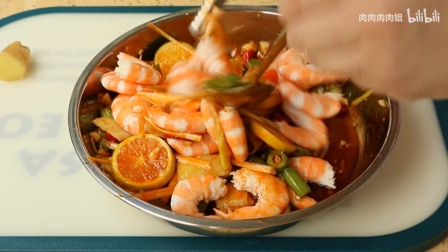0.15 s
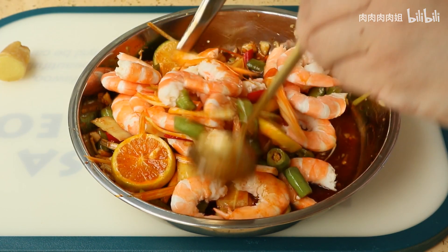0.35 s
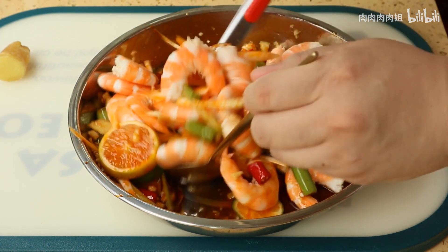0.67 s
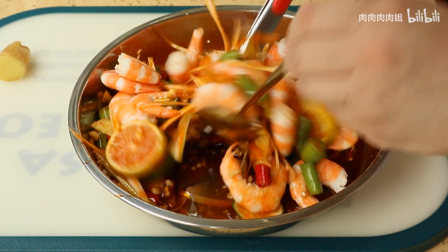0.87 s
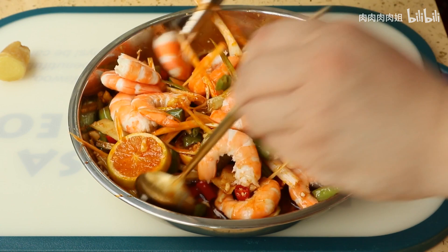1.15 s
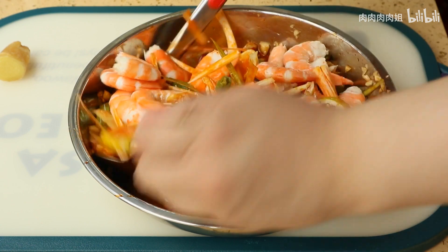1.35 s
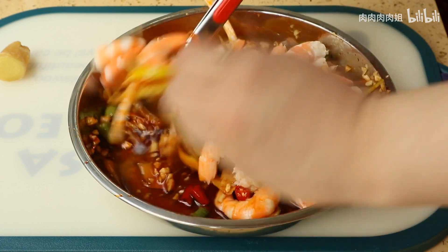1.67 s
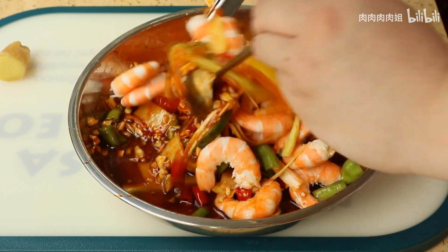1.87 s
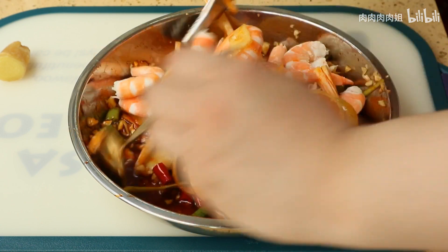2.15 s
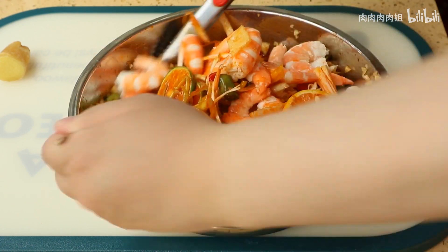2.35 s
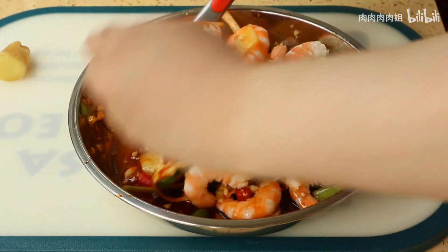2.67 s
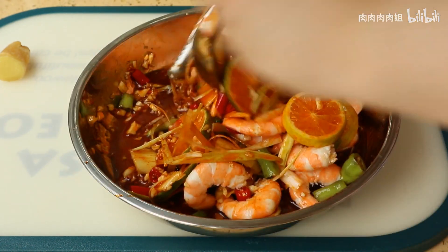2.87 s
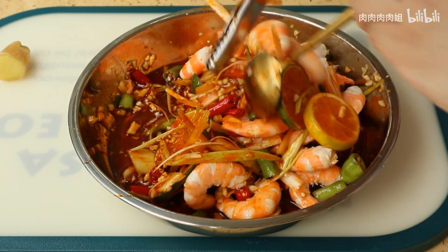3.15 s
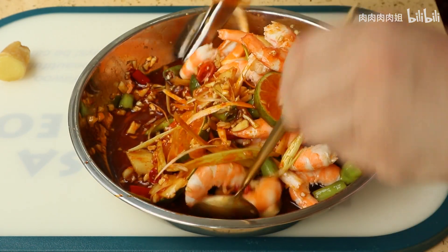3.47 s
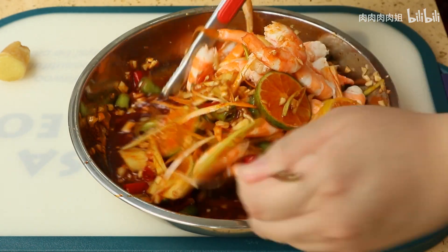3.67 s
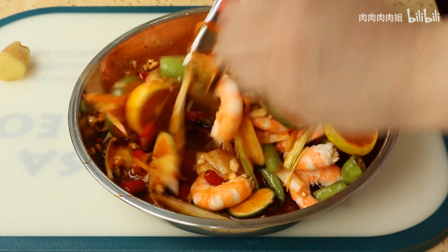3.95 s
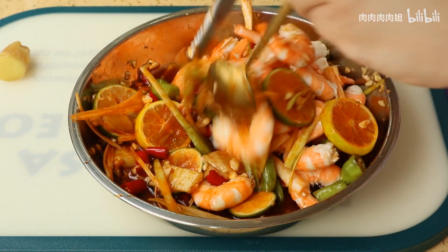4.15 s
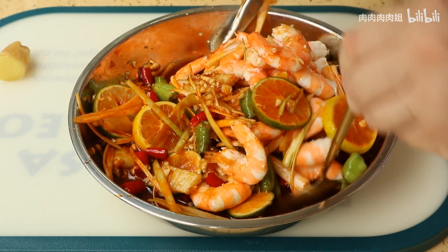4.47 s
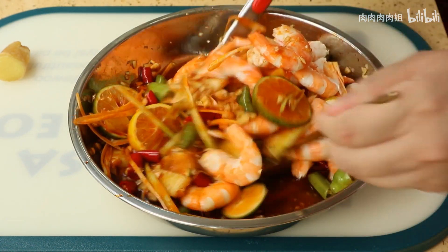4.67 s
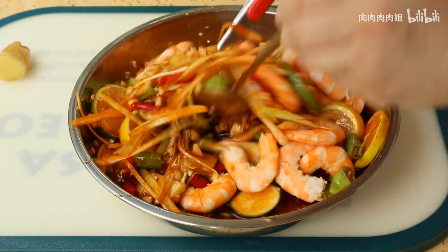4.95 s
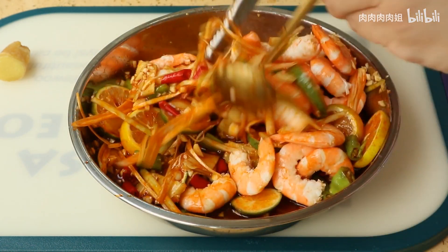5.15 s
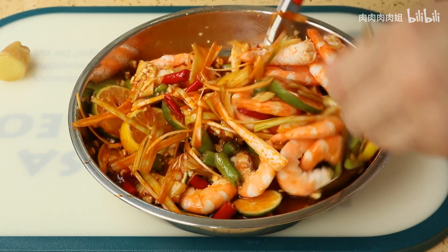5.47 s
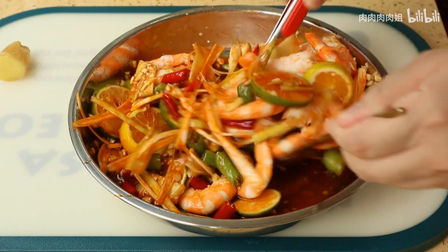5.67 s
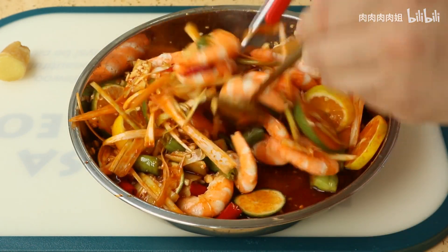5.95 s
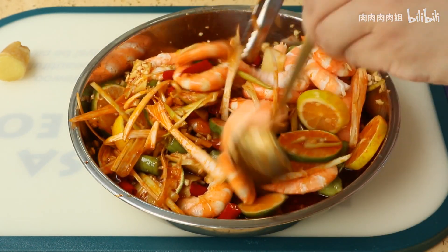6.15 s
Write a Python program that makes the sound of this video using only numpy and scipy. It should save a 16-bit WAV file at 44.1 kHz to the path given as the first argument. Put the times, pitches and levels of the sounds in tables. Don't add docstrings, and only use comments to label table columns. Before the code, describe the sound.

The tail of a spoon scrape opens, then steel utensils strike a loaded metal bowl in a regular tossing rhythm. The rings are short and damped by food, with quick rebounds, dull knocks on the plastic board, small ticks and soft wet slaps. Close stereo microphone, short hard-walled room echo; a low background rumble and hum sink after the loud blows and creep back.

```python
import sys
import numpy as np
from scipy import signal
from scipy.fft import rfft, irfft, next_fast_len
from scipy.io import wavfile
from scipy.ndimage import uniform_filter1d, map_coordinates

SR = 44100
rng = np.random.default_rng(int(sys.argv[2]) if len(sys.argv) > 2 else 0)


def waveform_to_disk(signal):
    frames = np.transpose(np.atleast_2d(signal))
    scaled = np.clip(frames, -1, 1) * 32767
    samples = np.round(scaled).astype(np.int16)
    wavfile.write(sys.argv[1], SR, samples)


def invert_db(level):
    return 10 ** (np.asarray(level, dtype=float) / 20)


N = 278271


def unit(x):
    return x / np.sqrt(np.mean(x ** 2) + 1e-20)


def along(points, hz):
    point_hz, value = np.transpose(points)
    return np.interp(np.log(hz + 1), np.log(point_hz + 1), value)


def wobble(rate):
    knots = rng.standard_normal(int(N * rate / SR) + 4)
    return map_coordinates(knots, [np.arange(N) * rate / SR])


# pitch_hz, likeness (0-1)
LIKENESS = [(60, 1.0), (100, 1), (180, 0.98), (310, 0.96), (550, 0.69), (950, 0.95), (1650, 0.63),
            (2860, 0.59), (4970, 0.08), (8640, 0.96), (15000, 0.31)]


def rush(gain, patchy_db):
    z = signal.stft(rng.standard_normal((2, N)), nperseg=512)[2]
    patches = uniform_filter1d(rng.standard_normal(z.shape[1:]), size=6, axis=0)
    patches = uniform_filter1d(patches, size=10, axis=1)
    pair = signal.istft(z * invert_db(patchy_db * unit(patches)), nperseg=512)[1][:, :N]
    size = next_fast_len(N + 8192)
    hz = np.fft.rfftfreq(size, 1 / SR)
    turn = np.arccos(np.clip(along(LIKENESS, hz), -1, 1)) / 2
    shares = [np.cos(turn), np.sin(turn)]
    mid, side = irfft(rfft(pair, size) * gain(hz) * shares, size)[:, :N]
    return unit(np.array([mid + side, mid - side]))


# time_s, level_db
ROOM_LEVEL = [(0.0, -38.5), (1.1, -36), (3.0, -39), (4.3, -39.5), (5.4, -38), (6.31, -40.5)]


def room_level_db():
    return np.interp(np.arange(N) / SR, *np.transpose(ROOM_LEVEL))


# pitch_hz, level_db (per Hz)
DRONE_COLOUR = [(15, -47), (25, -10), (87, -2.5), (149, -2.5), (229, -3), (427, -11.5), (754, -11),
                (1370, -15.5), (1740, -17), (2220, -20.5), (2410, -19.5), (5880, -34.5), (11300, -50),
                (14400, -66), (16000, -78)]


def drone():
    colour = lambda hz: invert_db(along(DRONE_COLOUR, hz))
    return invert_db(room_level_db() + 2.0 + 0.23 * wobble(3)) * rush(colour, patchy_db=1.6)


# pitch_hz, width_hz, level_db
ROOM_PEAKS = [(45, 5.9, 2), (158.4, 15, 4), (201, 28, -7), (771, 61, -3.5)]


def boom():
    def peaks(hz):
        return sum(invert_db(db) / np.sqrt(1 + ((hz - centre) / width * 2) ** 4)
                   for centre, width, db in ROOM_PEAKS)
    return invert_db(room_level_db() - 9.0) * rush(peaks, patchy_db=np.sqrt(2))


# time_s, pitch_hz, level_db
MOTOR_PATH = [(0.0, 87.1, -36), (0.26, 86.4, -42), (0.33, 84, -33.5), (0.83, 80.2, -42), (1.05, 85, -40),
              (1.47, 88, -42.5), (1.87, 80.5, -53), (2.05, 88.3, -40), (2.55, 84.5, -43.5),
              (2.95, 88.3, -38), (3.36, 83, -40), (3.58, 64.1, -55), (3.95, 72.3, -39.5), (4.24, 74.5, -58),
              (4.36, 73.2, -46), (4.65, 63.2, -52), (5.46, 70.6, -35.5), (6.31, 76.5, -55.5)]


def motor():
    now = np.arange(N) / SR
    time_s, pitch_hz, level_db = np.transpose(MOTOR_PATH)
    speed_hz = np.interp(now, time_s, pitch_hz) * (1 + 0.02846 * wobble(17))
    turns = np.cumsum(speed_hz) / SR
    strength_db = np.interp(now, time_s, level_db) - 1.0 + 1.46 * wobble(12)
    return invert_db(strength_db) * np.sin(2 * np.pi * turns)


def since_blows():
    return np.maximum(np.arange(N) / SR - np.array(HARD_BLOWS)[:, :1], 0)


# pitch_hz, level_db (per Hz)
SAUCE_COLOUR = [(1200, -32), (2500, 5.5), (4000, 0), (7000, -7), (11000, -9.5), (15000, -20)]


def slosh():
    rest_db, splash_db, rise_s, fall_s = -54, 16.5, 0.093, 0.32
    since = since_blows()
    surge = np.minimum(since / rise_s, 1) * np.exp(-since / fall_s)
    slosh_db = rest_db + splash_db * surge.max(axis=0)
    clumps = invert_db(1.5 * wobble(20) + 3 * wobble(200))
    wet = rush(lambda hz: invert_db(along(SAUCE_COLOUR, hz)), patchy_db=5.5)
    return invert_db(slosh_db - 1.5) * unit(clumps * wet)


def background():
    return drone() + boom() + motor() + slosh()


def dying_noise(gain, t60, size=SR // 2):
    hz, t, z = signal.stft(rng.standard_normal((2, size)), SR, nperseg=128)
    fading = invert_db(-60 * t / t60(hz)[:, None])
    return signal.istft(z * gain(hz)[:, None] * fading, SR, nperseg=128)[1][:, :size]


# pitch_hz, fade_s
ECHO_FADE = [(200, 0.1), (2000, 0.4), (10000, 0.16)]


def kitchen(x):
    fade = lambda hz: along(ECHO_FADE, hz)
    mid = dying_noise(np.ones_like, fade)[0]
    side = dying_noise(lambda hz: 0.98 * along(STEREO_SPREAD, hz), fade)[0]
    tail = np.array([mid + side, mid - side]) / np.linalg.norm(mid)
    late = np.pad(x.mean(axis=0), (300, 0))[None]
    return signal.fftconvolve(late, tail, axes=1)[:, :N]


# pitch_hz, fade_s
CLATTER_FADE = [(200, 0.27), (1500, 0.22), (4000, 0.21), (10000, 0.17)]
# pitch_hz, spread_radians
STEREO_SPREAD = [(200, 0.029), (700, 0.16), (2400, 0.18), (4400, 0.85), (8000, 0.89), (15000, 0.17)]


def contact(s, peak_db, hz, level_db, t60, clatter_db, sustain, chatter_s, flutter, size=SR // 2):
    t = np.arange(size) / SR
    chance = rng.standard_normal((3, len(hz), 1))
    lean = along(STEREO_SPREAD, hz) * chance[0] * [[[1]], [[-1]]]
    start = chance[1] ** 2 * chatter_s
    knots = rng.standard_normal((2, len(hz), size // 110))
    depth, drift = signal.resample(knots, len(t), axis=2) * flutter
    swell = np.clip((t - start) / 0.00018, 0, 1) * (1 + depth)
    fall = invert_db(level_db - 60 * t / (sustain * t60))
    pitch = hz * (1 + chance[2] / 1000)
    ring = (swell * fall * np.sin(2 * np.pi * pitch * t + drift + lean)).sum(axis=1)

    top_db = level_db[-1, 0]
    lift_db = 4.9 * np.clip(np.log2(hz[:, 0] / 5000), 0, 1)
    colour_db = uniform_filter1d(level_db[:, 0], size=3) + lift_db
    colour = list(zip([60, *hz[:, 0], 14000, 16300], [-55, *colour_db, top_db - 6, top_db - 37]))
    gain = lambda f: invert_db(along(colour, f))
    fade = lambda f: sustain * along(CLATTER_FADE, f)
    mid = dying_noise(gain, fade, size)[0]
    side = dying_noise(lambda f: gain(f) * along(STEREO_SPREAD, f), fade, size)[0]
    snap = (1 - np.exp(-t / 0.00014)) * (1 + 1.52 * np.exp(-t / 0.002))
    burst = np.array([mid + side, mid - side]) * snap

    loud = lambda x: np.sqrt(np.mean(x[:, :SR // 100] ** 2))
    both = ring / loud(ring) + invert_db(clatter_db) * burst / loud(burst)
    lead = SR // 400
    graze = invert_db(-40) * burst[:, :lead] / loud(burst)
    whole = invert_db(peak_db) * np.concatenate([graze, both / loud(both)], axis=1)
    return np.pad(whole, ((0, 0), (round(s * SR), N)))[:, lead:N + lead]


def rattle(modes, s, db, clatter_db, sustain, flutter=0.99):
    hz, level_db, t60 = np.transpose(modes)[:, :, None]
    return contact(s, db, hz, level_db, t60, clatter_db, sustain, chatter_s=.0004, flutter=flutter)


# pitch_hz, level_db, fade_s
SCRAPE_MODES = [(750, -6, .3), (1150, 0, .3), (1400, -1, .3), (1660, -1, .28), (2250, -2, .25),
                (3000, -10, .2), (3700, -4, .22), (5200, -14, .2), (9000, -22, .15)]


def scrape():
    return rattle(SCRAPE_MODES, 0, -32, clatter_db=-10, sustain=1.3)


# time_s, level_db
TONG_SNAP = [
    (2.1865, -22),
]
# pitch_hz, level_db, fade_s
TONG_MODES = [(2830, -4, 0.21), (4215, 1, 0.18), (4400, -8, 0.17), (6137, -7, 0.2), (8030, -2, 0.17),
              (10300, -7, .08), (11400, -12, .08), (12740, -16, 0.11)]


def tongs():
    time_s, level_db = TONG_SNAP[0]
    return rattle(TONG_MODES, time_s, level_db - 9, clatter_db=-4.0, sustain=1.0)


# time_s, level_db
BOARD_KNOCKS = [
    (0.5835, -20.5),
    (1.3009, -31),
    (3.577, -22),
    (4.574, -29),
    (5.548, -26.5),
]
# pitch_hz, level_db, fade_s
BOARD_MODES = [(190, -1, 0.15), (608, -9, 0.14), (801, 1, 0.12), (1276, -11, 0.093), (1665, 1.5, 0.12)]


def board():
    return sum(rattle(BOARD_MODES, s, db, clatter_db=-16, sustain=1.0, flutter=.5) for s, db in BOARD_KNOCKS)


COLOUR_ZONES = [500, 1500, 2700, 4300, 8500]
# bass_db, low_db, high_db, top_db
BRIGHTER = (0.1, 0.1, 35.5, 31.7)


def ticks(events, dull_db):
    hz = np.c_[WALL_PITCHES]
    t60, level_db = np.transpose(WALL_MODES)[:2, :, None]
    out = np.zeros((2, N))
    for s, db, brightness, sustain in events:
        bass_db, low_db, high_db, top_db = np.add(dull_db, np.multiply(brightness, BRIGHTER))
        zone_db = along(list(zip(COLOUR_ZONES, [bass_db, low_db, 0, high_db, top_db])), hz)
        mode_db = level_db + zone_db + rng.normal(0, 1.7, hz.shape)
        out += contact(s, db - 13.5, hz, mode_db, t60, 6.4, sustain, chatter_s=.002, flutter=1.0,
                       size=SR // 5)
    return out


# time_s, level_db, brightness (0-1), sustain (factor)
FOOD_SLAPS = [(1.1069, -37, 0.5, 0.81), (1.4701, -34.5, 0.44, 1.36), (2.0543, -27, 0.5, 2.07),
              (2.5296, -39, 0.27, 1.2), (2.7794, -31.5, 0.54, 1.77), (3.131, -43, 0.23, 0.82),
              (3.4465, -52, 0.43, .87), (4.1185, -30.5, 0.47, 1.03), (4.3944, -39, 0.65, 1.04),
              (4.6444, -25.5, 0.63, 3.5), (4.73, -34, 0.3, 1.2), (4.815, -29, 0.33, 1.6),
              (5.8358, -24.5, 0.4, 0.62), (5.9323, -38, 0, 0.74)]
# bass_db, low_db, high_db, top_db
SLAP_COLOUR = (-2.5, 5.5, -16.5, -12)


def slaps():
    return ticks(FOOD_SLAPS, SLAP_COLOUR)


# time_s, level_db, brightness (0-1), sustain (factor)
STEEL_TOUCHES = [(0.6727, -22.5, 0.38, 1), (1.1595, -23, 0, 0.75), (1.4214, -36.5, .95, 1.1),
                 (1.5436, -33.5, 0.83, 2.3), (2.0092, -35.5, 0.36, 1.7), (3.8448, -29.5, .1, 1.8),
                 (3.9913, -24.5, .9, 0.67), (4.6655, -28.5, .4, 0.73), (5.0164, -40, 0.46, 0.64),
                 (5.0824, -30, 0.17, .85), (5.8547, -34, 0.59, .74), (6.29, -34.5, .2, .8)]
# bass_db, low_db, high_db, top_db
TOUCH_COLOUR = (-14, -13, -23, -8)


def touches():
    return ticks(STEEL_TOUCHES, TOUCH_COLOUR)


# time_s, level_db, brightness (0-1), sustain (factor)
TOOL_JOLTS = [
    (1.2283, -7.5, .1, 0.85),
    (4.4874, -19, .3, .6),
]
# bass_db, low_db, high_db, top_db
JOLT_COLOUR = (-6, -15.5, -7, -17.5)


def jolts():
    return ticks(TOOL_JOLTS, JOLT_COLOUR)


def strikes(events, modes_hz, modes, clatter_db, sustain, softer):
    t60, level_db, *shifts_db = np.transpose(modes)[:, :, None]
    out = np.zeros((2, N))
    for s, db, *how in events:
        mode_db = level_db + np.tensordot(how, shifts_db, axes=1)
        held = max(sustain - softer * db, .2)
        out += contact(s, db - 3.5, np.c_[modes_hz], mode_db, t60, clatter_db, held,
                       chatter_s=0.00091, flutter=0.033 / t60)
    return out


# time_s, level_db, hardness (-1..1), height (-1.1..1), angle (-1..1)
TOOL_REBOUNDS = [
    (0.5811, -13.5, 0.01, 0.65, -0.71),
    (1.2989, -26.5, -0.37, 0.085, -0.8),
    (2.3151, -14.5, 0.98, 0.33, 0.019),
    (3.5753, -11, -0.073, 0.55, -0.041),
    (4.5366, -15.5, 0.98, -0.24, -0.75),
    (4.5715, -24, 0.28, -0.072, 0.58),
    (5.4704, -16, 1, -0.61, -0.34),
    (5.4984, -19, 0.56, -1.1, -0.81),
]
# time_s, level_db, hardness (-1..1), height (-1..1), angle (-1.2..1)
SOFT_LANDINGS = [
    (2.378, -27.5, 0.65, -0.33, -1.2),
    (3.5614, -21.5, 0.48, 0.018, -1.1),
    (5.5463, -17, 0.22, -0.1, -0.12),
    (5.669, -20.5, 0.36, -0.59, -0.84),
]
BASE_PITCHES = [200, 603, 790, 1190, 1560, 1740, 2150, 2560, 2805, 3047, 3505, 4115, 4715, 5243, 5600, 6955,
                7600, 8200, 10300]
# fade_s, level_db, then the change in dB per hardness, height and angle
BASE_MODES = [(0.08, -10.0, -9.0, 0.0, -0.0), (0.14, -19.0, -8.0, -4.0, -2.0),
              (0.13, -13.0, -9.0, 8.0, -5.0), (0.12, -17.0, 2.0, -1.0, -0.0),
              (0.12, -12.0, 0.0, -0.0, -11.0), (0.12, -14.0, 1.0, -2.0, -5.0),
              (0.1, -16.0, 2.0, -5.0, -3.0), (0.1, -19.0, -9.0, -9.0, -4.0), (0.16, -12.0, 5.0, -2.0, -3.0),
              (0.35, -13.0, 3.0, -5.0, 8.0), (0.14, -14.0, 9.0, 0.0, -0.0), (0.1, -17.0, 8.0, 3.0, 6.0),
              (0.13, -17.0, 1.0, 9.0, -3.0), (0.13, -21.0, 8.0, 2.0, 3.0), (0.1, -23.0, 6.0, -2.0, -6.0),
              (0.09, -24.0, -1.0, 3.0, -4.0), (0.07, -25.0, -2.0, 2.0, -6.0),
              (0.07, -25.0, -0.0, 4.0, -1.0), (0.06, -28.0, 1.0, -4.0, 2.0)]


def rebounds():
    free = strikes(TOOL_REBOUNDS, BASE_PITCHES, BASE_MODES, -7.5, sustain=0.71, softer=0)
    return free + strikes(SOFT_LANDINGS, BASE_PITCHES, BASE_MODES, -1.5, sustain=0.39, softer=0)


# time_s, level_db, hardness (-1..1), height (-1..1), angle (-1..1)
HARD_BLOWS = [
    (0.5351, -7.5, -0.38, -0.65, 0.26),
    (1.2124, 0, 1, -0.21, -0.4),
    (2.2717, -6.5, 0.13, 0.75, -0.1),
    (3.5346, -8, 0.31, -0.31, -0.17),
    (4.4689, -4.5, 0.98, 0.0052, 0.44),
    (5.4443, -8.5, -0.77, 0.38, -0.3),
]
WALL_PITCHES = [200, 619, 890, 1210, 1570, 1755, 2150, 2300, 2510, 2640, 2760, 2810, 3047, 3505, 3880, 4115,
                4420, 4700, 5238, 5660, 6400, 7030, 8300, 10100, 11100]
# fade_s, level_db, then the change in dB per hardness, height and angle
WALL_MODES = [(0.07, -21.0, -0.0, -8.0, 4.0), (0.12, -22.0, -0.0, 4.0, 1.0), (0.08, -19.0, -4.0, -3.0, 2.0),
              (0.09, -11.0, 2.0, -3.0, 1.0), (0.07, -17.0, -1.0, 1.0, 2.0), (0.1, -10.0, 5.0, 6.0, -6.0),
              (0.09, -12.0, 2.0, -9.0, 3.0), (0.07, -16.0, 4.0, -4.0, -1.0), (0.09, -16.0, 1.0, -6.0, -5.0),
              (0.08, -16.0, -5.0, -4.0, 3.0), (0.1, -11.0, -5.0, -1.0, 2.0), (0.14, -14.0, -6.0, 2.0, 5.0),
              (0.35, -20.0, 1.0, -6.0, -1.0), (0.14, -15.0, 2.0, 5.0, -2.0), (0.08, -22.0, 6.0, -6.0, -1.0),
              (0.1, -12.0, 4.0, -1.0, -1.0), (0.07, -24.0, -6.0, -6.0, -4.0), (0.13, -25.0, 4.0, 1.0, -2.0),
              (0.13, -22.0, 11.0, 8.0, 4.0), (0.11, -28.0, 9.0, -5.0, 2.0), (0.12, -35.0, 2.0, -0.0, 4.0),
              (0.09, -33.0, 3.0, 2.0, 7.0), (0.1, -40.0, 12.0, 1.0, 1.0), (0.07, -38.0, 16.0, 1.0, 0.0),
              (0.06, -35.0, 10.0, -4.0, -1.0)]


def blows():
    return strikes(HARD_BLOWS, WALL_PITCHES, WALL_MODES, -10.5, sustain=0.37, softer=0.069)


def tools():
    metal = tongs() + scrape() + board() + slaps() + touches() + jolts() + rebounds() + blows()
    return signal.sosfilt(signal.butter(2, 130, "high", fs=SR, output="sos"), metal)


def ducking_db():
    threshold_db, ratio = -10.5, 1.377
    attack_s, hold_s, recover_db_per_s = 0.037, .3, 10
    since = since_blows()
    depth_db = ratio * (np.array(HARD_BLOWS)[:, 1:2] - threshold_db)
    left_db = depth_db - recover_db_per_s * np.maximum(since - hold_s, 0)
    return -np.max(np.minimum(since / attack_s, 1) * np.maximum(left_db, 0), axis=0)


def scene():
    metal = tools()
    lingering = invert_db(-13) * kitchen(metal) + background()
    return metal + invert_db(ducking_db()) * lingering


def top_cut(x):
    return signal.sosfilt(signal.butter(12, 16400, fs=SR, output="sos"), x)


def record(dry):
    low_pass = signal.butter(10, 16500, fs=SR, output="sos")
    mix = signal.sosfiltfilt(low_pass, np.clip(dry, -1, 1))
    return top_cut(mix)


dry = scene()
out = record(dry)
waveform_to_disk(out)
```